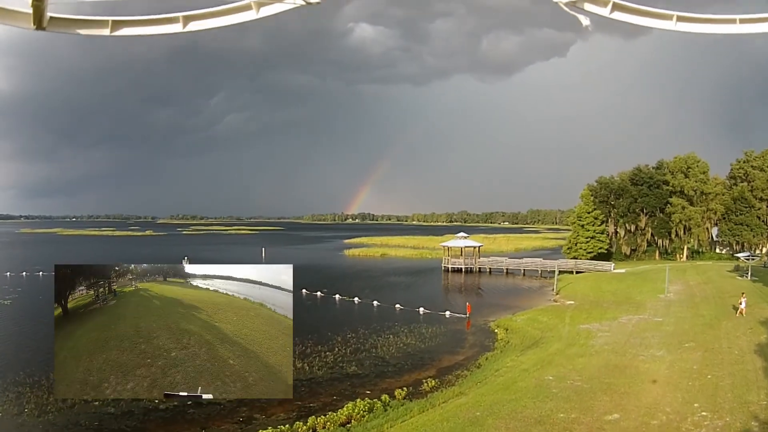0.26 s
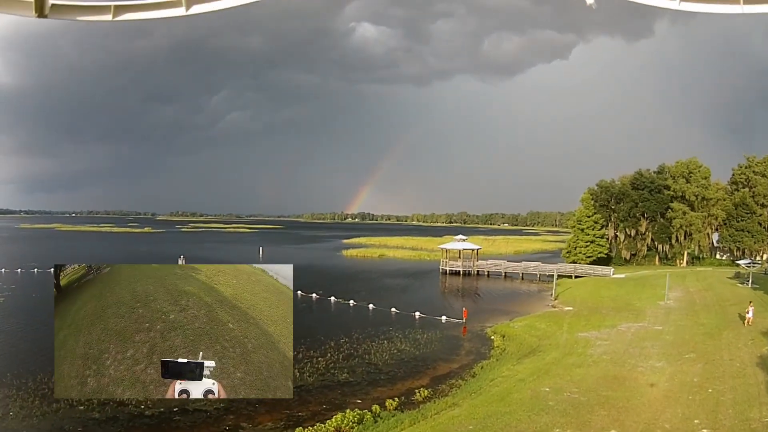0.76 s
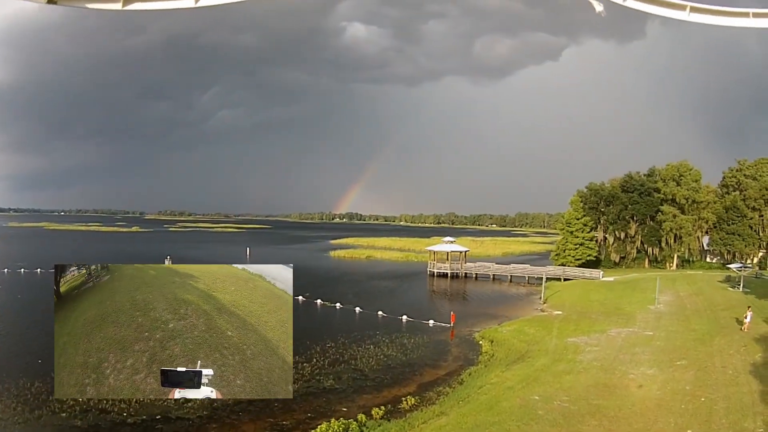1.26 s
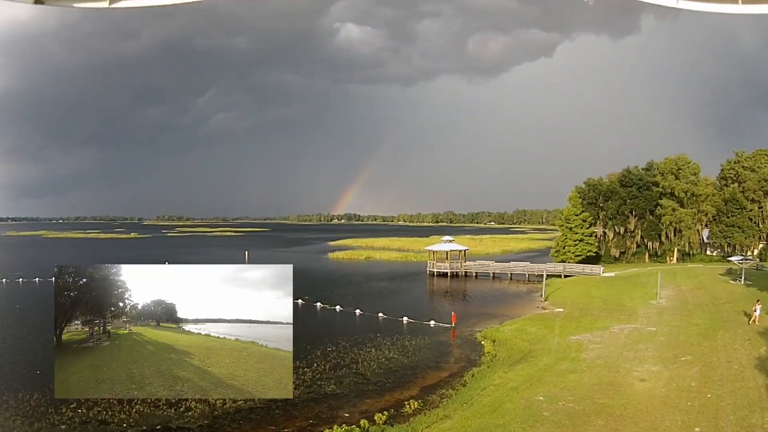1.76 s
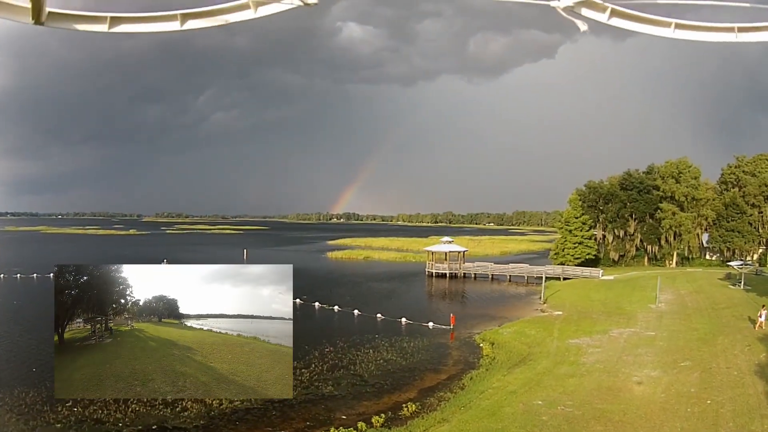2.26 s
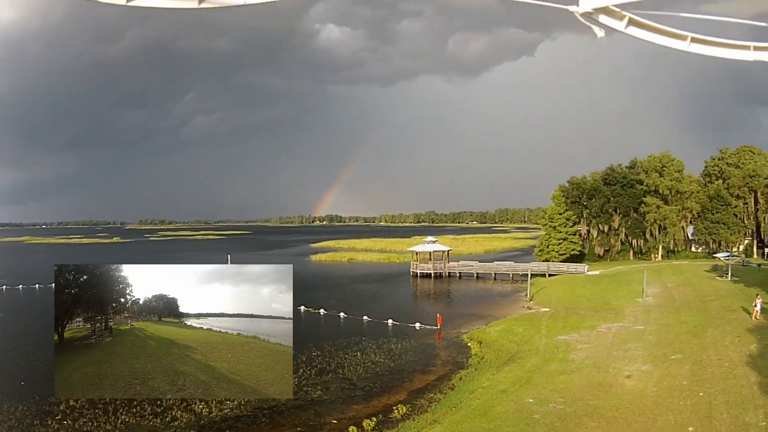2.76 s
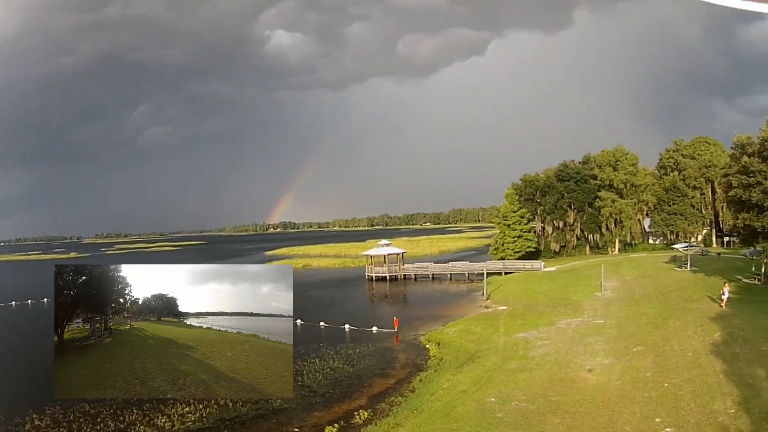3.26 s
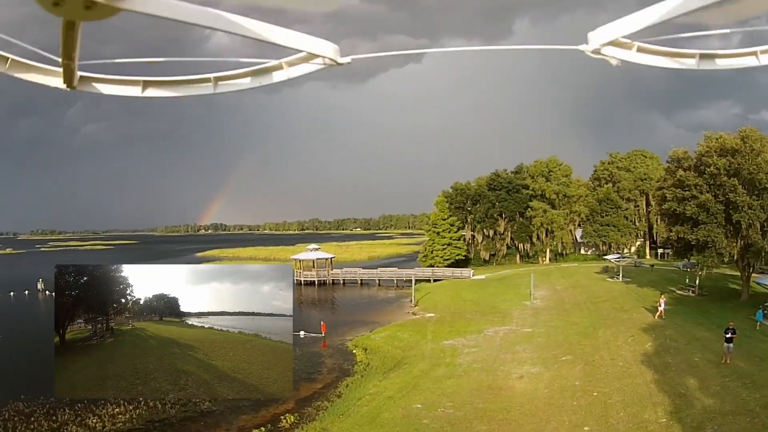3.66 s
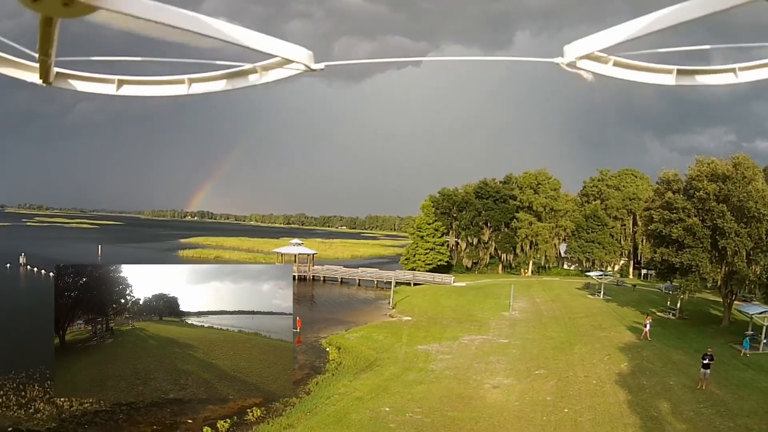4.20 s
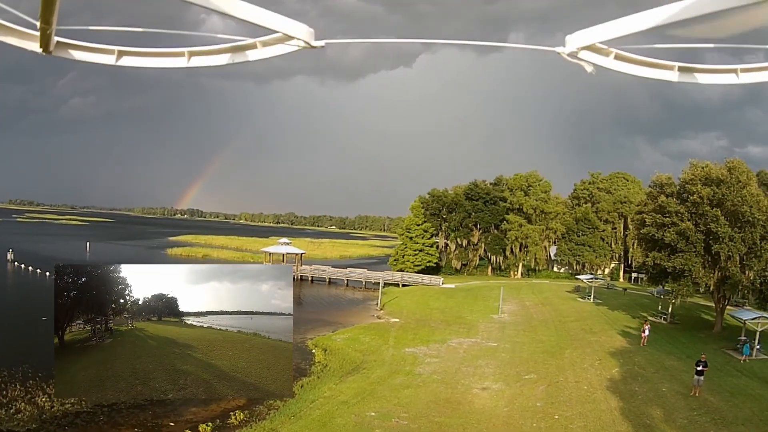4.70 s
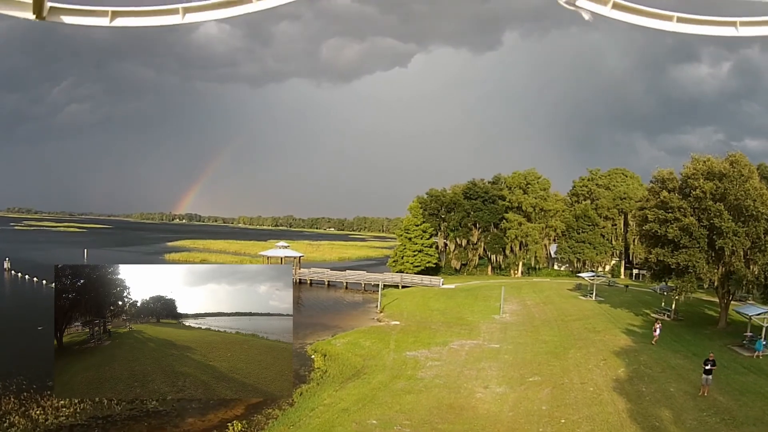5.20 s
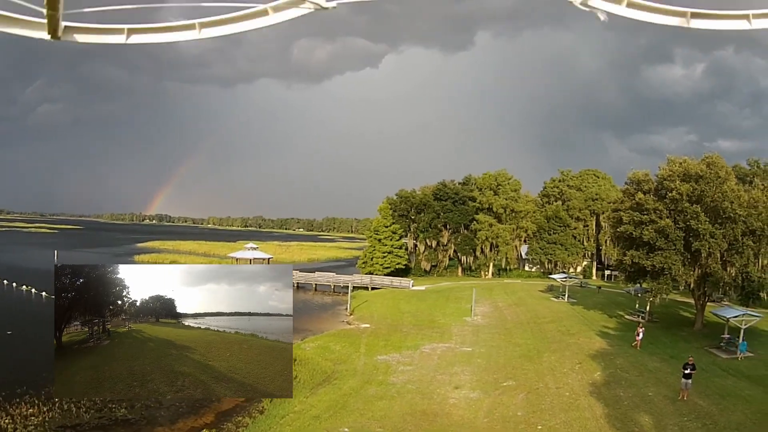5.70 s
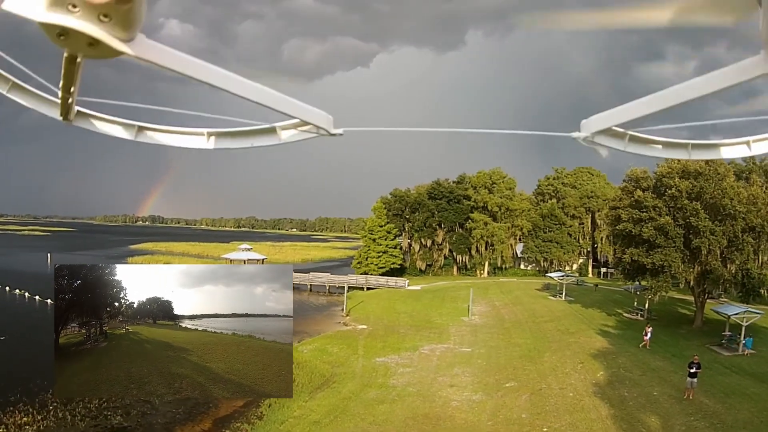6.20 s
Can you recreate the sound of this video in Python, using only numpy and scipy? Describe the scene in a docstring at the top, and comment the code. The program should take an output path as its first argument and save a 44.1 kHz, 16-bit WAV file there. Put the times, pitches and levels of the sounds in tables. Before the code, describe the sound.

A quadcopter hovers outdoors, heard from a microphone hanging just beneath it. Its propellers buzz with a wavering pitch over a hiss of churned air, with a thin motor whine and a brief raspy sizzle early on. Wind then starts to rumble, thumping hardest on the microphone a little past halfway. The buzz rises in pitch and settles again while the gusts continue.

```python
"""A quadcopter hovers and turns over a lakeside park, heard from a camera slung under it.
Two fast propellers beat against each other over two slower ones, and the blades churn the air
into a hiss. A motor whines thinly and whistles now and then; a rasping sizzle passes early on.
Gusts rumble and thump on the microphone as the craft swings round, and a few faint ticks sound."""
import sys
import numpy as np
from scipy import signal
from scipy.fft import rfft, irfft, next_fast_len
from scipy.io import wavfile
from scipy.ndimage import uniform_filter1d

SR = 44100
rng = np.random.default_rng(int(sys.argv[2]) if len(sys.argv) > 2 else 0)


def waveform_to_disk(signal):
    """Save audio, clipped to [-1, 1], as 16-bit WAV at the path in sys.argv[1]."""
    frames = np.transpose(np.atleast_2d(signal))
    scaled = np.clip(frames, -1, 1) * 32767
    samples = np.round(scaled).astype(np.int16)
    wavfile.write(sys.argv[1], SR, samples)


N = 284429
T = np.arange(N) / SR
FFT_SIZE = next_fast_len(N, real=True)
BIN_HZ = np.fft.rfftfreq(FFT_SIZE, 1 / SR)
HOVER_HZ = 225  # blade passes per second


def amp(db):
    return 10 ** (np.asarray(db) / 20)


def unit(x):
    return x / np.sqrt(np.mean(x ** 2) + 1e-20)


def curve(rows, column=1):
    """An automation lane: straight ramps between timed points."""
    rows = np.asarray(rows)
    return np.interp(T, rows[:, 0], rows[:, column])


def level_at(points, hz):
    """Level in dB of an EQ curve drawn on a log-frequency axis."""
    point_hz, db = np.transpose(points)
    return np.interp(np.log(hz + 1), np.log(point_hz + 1), db)


def colour(x, points):
    """Runs x through an EQ curve, rolled off beyond its ends; comes out at rms 1."""
    low_cut = np.minimum(BIN_HZ / points[0][0], 1) ** 2
    high_cut = np.minimum(points[-1][0] / (BIN_HZ + 1), 1) ** 2
    gain = amp(level_at(points, BIN_HZ)) * low_cut * high_cut
    return unit(irfft(rfft(x, FFT_SIZE) * gain, FFT_SIZE)[:N])


def noise(points):
    return colour(rng.standard_normal(N), points)


def wander(rate_hz):
    """A smooth random modulator of rms 1."""
    spectrum = rfft(rng.standard_normal(FFT_SIZE)) / (1 + (BIN_HZ / rate_hz) ** 2)
    return unit(irfft(spectrum, FFT_SIZE)[:N])


def spin(hz, jitter):
    """Phase of a rotor or oscillator whose rate trembles by the share `jitter`."""
    trembling_hz = hz * (1 + jitter * wander(31.1))
    return 2 * np.pi * np.cumsum(trembling_hz) / SR + rng.uniform(0, 2 * np.pi)


def throttle_nudges(depth_hz=0.52, rate_hz=5):
    """The flight controller nudges a rotor's speed up and down, a few uneven times a second."""
    cycles = np.cumsum(rate_hz * (1 + .4 * wander(3.02))) / SR
    return depth_hz * np.sin(2 * np.pi * (cycles + rng.random()))


# Fader for the lead propeller's strong harmonics as the craft tilts: time_s, level_db
LEAD_LEVEL = [(0.0, -53), (3.11, -54.5), (3.77, -54), (3.88, -53.5), (5.08, -53), (5.15, -51), (5.44, -52),
              (5.7, -49.5), (5.93, -53), (6.45, -53)]
# Their balance, keyed by harmonic number: hover_db, speed_db_per_hz, crosswind_db
LEAD_HARMONICS = {1: (-5.5, 0.39, -1.1), 3: (0, 0.099, -2), 4: (-6.5, -0.016, 4.2), 5: (-6, -0.17, -2.9)}
# The second harmonic, swelling in the hard turn: time_s, level_db
SECOND_LEVEL = [(0, -58), (.7, -59), (1.1, -63.5), (1.8, -71), (3.1, -66.5), (3.35, -69), (3.6, -70),
                (4.95, -69), (5.14, -48), (5.6, -55), (5.8, -77.5), (6.45, -64.5)]
# Seesaw that lifts the fourth harmonic and ducks the fifth: time_s, gain_db
SEESAW = [(0, -.5), (1.3, -.5), (1.7, 1), (2.3, 0), (2.8, 2), (3.3, 0), (5.2, -1), (6.45, 0)]


def lead_tones(speed, ring_hz=964, ring_width_hz=37, ring_db=6.5):
    """The lead's low harmonics in dB; an airframe resonance lifts whichever one crosses it."""
    level, windy = curve(LEAD_LEVEL), crosswind()
    tone_db = {2: curve(SECOND_LEVEL)}
    for k, (hover_db, db_per_hz, wind_db) in LEAD_HARMONICS.items():
        resonance = ring_db / (1 + ((k * speed - ring_hz) / ring_width_hz) ** 2)
        tone_db[k] = level + hover_db + db_per_hz * (speed - HOVER_HZ) + wind_db * windy + resonance
    tone_db[4] += curve(SEESAW)
    tone_db[5] -= curve(SEESAW)
    return tone_db


# EQ of the partner propeller's harmonics at the microphone: freq_hz, level_db
PARTNER_EQ = [(230, -66.5), (450, -77.5), (510, -66), (660, -67.5), (740, -69.5), (910, -73.5), (965, -65),
              (1030, -61), (1080, -70.5), (1170, -72), (1260, -77.5), (1320, -80), (1375, -77), (1450, -85),
              (1610, -76.5), (1850, -81.5), (1980, -94), (2200, -100.5), (3100, -97), (3600, -99.5)]
# The partner's fader, lowest while it lags: time_s, gain_db
PARTNER_GAIN = [(0, 0), (3.1, 1.5), (3.75, -1.5), (4, -8), (4.3, -0.5), (4.9, 1.5), (5.3, 2.5), (6.45, -3)]


def partner_tones(speed):
    """The partner's harmonics in dB, rising and dipping as its speed slides them along the EQ."""
    return {k: level_at(PARTNER_EQ, k * speed) + curve(PARTNER_GAIN) for k in range(1, 16)}


# How the airframe colours the blade buzz: freq_hz, gain_db
AIRFRAME_EQ = [(110, -11.5), (180, -12), (340, -2), (440, -8), (700, 3), (1050, 2.5), (1290, -17.5),
               (1370, -12), (1420, -27.5), (1500, -6.5), (1550, -14), (1605, -5), (1750, -8), (1830, -10.5),
               (1900, -10.5), (2020, -14), (2150, -23), (2700, -36), (3150, -18), (3600, -20.5)]
# The craft's swing toward the shore: time_s, turn_share (0-1)
TURN = [(0, 0), (2.8, 0), (4, .35), (5.2, .5), (5.8, .9), (6.45, 1)]
# EQ that fades in on the blade harmonics with that swing: freq_hz, gain_db
TURNED_EQ = [(345, -5.5), (460, 2), (660, -6), (800, -2.5), (950, -2.5), (1150, 0.5), (1350, -3),
             (1600, 1.5), (1780, 3.5), (1880, 5.5), (1970, -2), (2150, 1.5)]


def propeller(speed, phase, flutter, imbalance_db, tone_db, buzz_db, count=15):
    """Blade-pass harmonics: those in tone_db have their own level, the rest buzz through the frame."""
    # The buzz grows with the lead's speed and in a crosswind.
    drive_db = 0.1174 * (curve(LEAD_SPEED) - HOVER_HZ) + 0.5 * crosswind()
    buzz_level = -65.5 + drive_db + buzz_db
    inflow = [wander(24) for _ in range(7)]
    out, turn = np.zeros(N), curve(TURN)
    for k in range(1, count + 1):
        db = tone_db[k] if k in tone_db else buzz_level + level_at(AIRFRAME_EQ, k * speed)
        level = amp(db + turn * level_at(TURNED_EQ, k * speed))
        # Uneven inflow shakes the high harmonics most.
        shake = 1 + flutter * np.sqrt(k) * np.roll(inflow[k % len(inflow)], k * SR)
        out += level * shake * np.cos(k * phase + rng.uniform(0, 2 * np.pi))
    for k in np.arange(1, count // 2) - .5:  # unequal blades add weak tones between the harmonics
        level = amp(buzz_level + imbalance_db + level_at(AIRFRAME_EQ, k * speed))
        out += level * np.cos(k * phase + rng.uniform(0, 2 * np.pi))
    return np.sqrt(2) * out


# Blade-pass pitch of the lead propeller: time_s, pitch_hz
LEAD_SPEED = [(0.0, 220), (0.08, 222), (0.19, 218.7), (0.38, 218.3), (0.52, 223.3), (0.77, 228),
              (0.95, 221.4), (1.22, 221.2), (1.36, 224.5), (1.5, 223.8), (1.87, 231.5), (2.03, 224.0),
              (2.26, 229.6), (2.55, 216.2), (2.7, 217.5), (2.83, 223), (3.02, 213.3), (3.34, 220.5),
              (3.5, 240.5), (3.62, 230), (3.73, 247), (3.89, 224.3), (4.0, 224), (4.12, 229), (4.51, 228),
              (4.69, 234.5), (4.78, 233.3), (4.92, 236.5), (5.06, 251), (5.15, 269), (5.32, 252),
              (5.4, 252.5), (5.51, 245), (5.7, 241), (5.98, 218.3), (6.14, 223.2), (6.27, 209.5),
              (6.45, 217.3)]
# Blade-pass pitch of its partner, which surges and lags to steer: time_s, pitch_hz
PARTNER_SPEED = [(0, 232), (.15, 233), (.45, 228), (.92, 227.5), (1.28, 213.5), (1.47, 220), (1.62, 213.5),
                 (1.85, 222), (2.25, 228), (2.52, 221), (2.7, 218), (2.88, 228), (3.1, 229), (3.18, 243),
                 (3.27, 246), (3.34, 256), (3.4, 256), (3.52, 235), (3.75, 240), (3.97, 207), (4.2, 218),
                 (4.58, 227), (4.8, 224), (4.95, 226), (5.23, 249), (5.42, 240), (5.6, 243), (5.98, 218),
                 (6.2, 220), (6.45, 216)]


def rotors(slow_hz=172.9, drift_hz=8, lead_gain_db=-5):
    """Two fast propellers beat over a slower pair that drifts together, all in a wash of air."""
    lead, partner = curve(LEAD_SPEED), curve(PARTNER_SPEED)
    slow = slow_hz + drift_hz * wander(1.5)
    slow_mate = slow * 1.035
    lead_phase = spin(lead + throttle_nudges(), jitter=.0018)
    partner_phase = spin(partner + throttle_nudges(), jitter=.002)
    flutter = 0.063 + 0.0077 * crosswind()
    tones = amp(lead_gain_db) * propeller(lead, lead_phase, flutter,
                                          imbalance_db=-22, tone_db=lead_tones(lead), buzz_db=2.5)
    tones += propeller(partner, partner_phase, flutter,
                       imbalance_db=-27.5, tone_db=partner_tones(partner), buzz_db=-11.5)
    tones += propeller(slow, spin(slow, jitter=0.0021), flutter=0.12,
                       imbalance_db=-19, tone_db={2: -70}, buzz_db=-21)
    tones += propeller(slow_mate, spin(slow_mate, jitter=0.0045), flutter=0.13,
                       imbalance_db=-26, tone_db={}, buzz_db=-16)
    return tones + blade_wash(lead_phase, partner_phase)


# Colour of the air churned by the blades: freq_hz, gain_db
WASH_EQ = [(150, 5), (350, 3), (550, 3), (750, 4.5), (1050, 5), (1400, -7), (1800, -2.5), (2300, -13),
           (2700, -11.5), (3000, -9), (3300, -10), (3980, -14), (4650, -9), (4980, -13), (5400, -7.5),
           (6000, -16), (6500, -25), (7200, -52.5), (10000, -62), (14000, -68)]
# Its fader: time_s, level_db
WASH_LEVEL = [(0, -62), (.3, -63), (.5, -62), (1.35, -64), (1.95, -61.5), (2.9, -63), (3.5, -60.5),
              (3.95, -65.5), (4.35, -62.5), (4.85, -62), (5.2, -58), (5.7, -57), (6.05, -60.5), (6.25, -62),
              (6.45, -61)]


def blade_wash(lead_phase, partner_phase, flicker_db=.9):
    """Churned air hisses, chopped once per blade pass by each fast propeller."""
    chop = 1 + 0.04 * np.cos(lead_phase) + 0.12 * np.cos(partner_phase)
    hiss = colour(chop * rng.standard_normal(N), WASH_EQ)
    return hiss * amp(curve(WASH_LEVEL) + flicker_db * wander(18))


# The motor whine, clearest in the calm hover: time_s, pitch_hz, level_db
WHINE_PATH = [(0, 3340, -82), (.13, 3410, -86), (.26, 3600, -86), (.45, 3580, -77), (.54, 3420, -75),
              (.66, 3450, -80), (.76, 3450, -77), (.86, 3480, -80), (1.05, 3390, -78), (1.5, 3250, -113),
              (3.2, 3100, -109), (3.75, 3164, -82), (4.1, 3060, -88), (4.6, 3145, -81), (5.3, 2945, -84),
              (6.1, 3120, -81.5), (6.45, 3240, -84)]


def motor_whine(gain_db=4.5):
    """A motor sings one thin, wavering tone."""
    level = amp(curve(WHINE_PATH, column=2) + gain_db)
    return level * np.sin(spin(curve(WHINE_PATH), jitter=0.0023))


# Fader for the deepest, slowest buffeting: time_s, level_db
HEAVE_LEVEL = [(0, -63.5), (.7, -60.5), (1.05, -57.5), (1.5, -53.5), (1.85, -52), (2.1, -50), (2.7, -53),
               (3.1, -50.5), (3.6, -48.5), (3.9, -37), (4.3, -40.5), (4.9, -45.5), (5.4, -42.5), (6.1, -41),
               (6.45, -45.5)]
# Its sub-bass colour: freq_hz, gain_db
HEAVE_EQ = [(20, -7), (30, -6.5), (45, 0), (62, -1.5), (85, -7.5), (130, -35)]
# Wind pressure on the microphone, the rumble's fader: time_s, level_db
GUST_LEVEL = [(0, -54.5), (1.35, -57), (1.68, -52.5), (1.87, -41), (2.2, -44), (2.7, -49.5), (3.07, -47.5),
              (3.35, -42.5), (3.68, -41.5), (3.87, -30), (3.97, -37.5), (4.06, -29.5), (4.17, -34.5),
              (4.33, -33.5), (4.45, -33), (4.8, -38.5), (4.96, -42), (5.2, -36), (5.7, -38), (6.08, -36),
              (6.45, -42.5)]
# The rumble's bass colour: freq_hz, gain_db
RUMBLE_EQ = [(45, -9), (70, -1), (92, 5), (118, 3), (150, -0.5), (200, -9.5), (280, -29.5)]
# Fader for the small eddies: time_s, level_db
SMALL_EDDY_LEVEL = [(0, -72), (1.5, -74.5), (1.85, -63.5), (3.1, -62), (3.4, -56), (3.68, -54), (3.9, -47),
                    (4.15, -44), (4.9, -44.5), (5.7, -50), (6.1, -54.5), (6.45, -55.5)]
# Their low-mid colour: freq_hz, gain_db
SMALL_EDDY_EQ = [(100, -15), (200, 4), (280, 0.4), (400, -11), (550, -19.5), (800, -34.5), (1500, -60.5)]


def wind(gustiness_db=0.5, rumble_gain_db=-1.5, eddy_gain_db=2):
    """Large eddies heave, rumble and thump; strong gusts add smaller, higher ones."""
    heave = amp(curve(HEAVE_LEVEL)) * buffet(HEAVE_EQ, steadiness=0.78)
    rumble_db = curve(GUST_LEVEL) + rumble_gain_db + gustiness_db * wander(3.4)
    rumble = amp(rumble_db) * buffet(RUMBLE_EQ, steadiness=0.36)
    eddies = amp(curve(SMALL_EDDY_LEVEL) + eddy_gain_db) * buffet(SMALL_EDDY_EQ, steadiness=0.23)
    return heave + eddies + gust_front() + with_thumps(rumble)


def buffet(points, steadiness):
    """Turbulence at the microphone port; steadiness (0-1) evens it out like a compressor."""
    turbulence = noise(points)
    power = uniform_filter1d(turbulence ** 2, size=4400)
    return unit(turbulence / (power + 1e-6) ** (steadiness / 2))


def crosswind(calm_db=-58, range_db=14.5):
    """How strongly the gusts stream across the propellers, 0-1."""
    return np.clip((curve(GUST_LEVEL) - calm_db) / range_db, 0, 1)


# Fader for the faint treble hiss: time_s, level_db
TREBLE_LEVEL = [(0, -79), (1.6, -79), (1.95, -84), (2.6, -79.5), (3.4, -81), (4.1, -101), (4.85, -88),
                (5.7, -85.5), (6.05, -95.5), (6.45, -83)]
# Its top-end colour: freq_hz, gain_db
TREBLE_EQ = [(6000, 7.5), (7200, 7), (8500, 3), (9500, 6), (10400, 5), (11500, -5), (15000, -8)]


def treble_hiss(flicker_db=6.5):
    """A faint treble hiss that flickers and drops away in the louder passages."""
    flicker = flicker_db * crosswind() * np.tanh(wander(24))
    return amp(curve(TREBLE_LEVEL) + flicker) * noise(TREBLE_EQ)


# Flares of motor whistle: peak_s, length_s, pitch_hz, glide_hz_per_s, level_db
WHISTLE_FLARES = [(0.276, 0.115, 4780, 149, -64.5), (2.34, .08, 4730, -1, -74),
                  (2.43, 0.038, 4760, 200.5, -64.5), (2.6, 0.042, 4760, 2000, -65),
                  (2.686, 0.019, 4760, -1500, -68), (2.755, 0.02, 4740, 2500, -63.5),
                  (2.98, .03, 4480, -1800, -75), (3.098, 0.052, 4730, -2500, -74),
                  (3.36, 0.036, 4770, 1602, -68), (3.84, 0.045, 4750, 1200, -66),
                  (4.6, .08, 4780, -200, -78)]


def motor_whistles(reach_hz=150, ring_hz=4778, ring_gain_db=-24, ring_width_hz=45, roughness=0.22):
    """Motor whines flare as they glide near a sharp resonance, which also rings faintly throughout."""
    flares = np.zeros(N)
    tremble = 1 + .0013 * wander(70)
    for peak_s, length_s, pitch_hz, glide, db in WHISTLE_FLARES:
        t = T - peak_s
        hz = (pitch_hz + reach_hz * np.tanh(glide * t / reach_hz)) * tremble
        swell = amp(db) / (1 + (t / (length_s * 2 / 3)) ** 4)
        flares += swell * np.sin(2 * np.pi * np.cumsum(hz) / SR)
    ring_level = amp(curve(WASH_LEVEL) + ring_gain_db)
    ring = ring_level * wander(ring_width_hz) * np.sin(2 * np.pi * ring_hz * T)
    return flares * (1 + roughness * wander(60)) + ring


# Colour of the passing sizzle: freq_hz, gain_db
SIZZLE_EQ = [(2000, -10), (2700, 6), (3450, 5.5), (4100, 0), (4500, -11), (4900, -39), (5300, -25),
             (6500, -34), (7800, -7), (9700, -19), (11800, -5.5), (12800, -18)]
# Its hollow resonances as it begins: pitch_hz, gain_db
SIZZLE_RESONANCES = [(2850, -5), (3150, -6), (3560, -5), (4650, -8.5), (5430, -10), (6120, -10),
                     (7150, -16), (8050, -13)]


def sizzle(start_s=0.28, rise_s=0.31, end_s=1.73, fall_s=0.37, level_db=-69, sag_db_per_s=2):
    """A grainy, rasping hiss with sinking hollow resonances comes and goes in the calm hover."""
    age = T - start_s
    fade = np.clip(np.minimum(age / rise_s, (end_s - T) / fall_s), 0, 1)
    rasp_db = 2 * np.sin(spin(hz=28, jitter=0.34))
    sink = 1 - .05 * age  # the resonances drop 5% a second
    rings = sum(amp(db) * wander(170) * np.sin(spin(hz * sink, jitter=0.00388))
                for hz, db in SIZZLE_RESONANCES)
    hiss = noise(SIZZLE_EQ) + rings
    grain_db = 2 * wander(100)
    return fade * amp(level_db - sag_db_per_s * age) * unit(hiss * amp(grain_db + rasp_db))


def puff(peak_s=.54, width_s=.016, level_db=-57):
    """One soft, dull puff of air."""
    swell = np.exp(-((T - peak_s) / width_s) ** 2)
    return amp(level_db) * swell * noise([(400, -8), (560, 0), (800, -6), (1200, -5), (1600, -20)])


# Single large eddies hitting the microphone: peak_s, width_s, pitch_hz, peak_db
EDDY_THUMPS = [(2.17, .016, 95, -34), (3.53, .022, 85, -30), (3.885, .022, 92, -24),
               (4.06, .012, 100, -22.5), (4.16, .022, 100, -22.5), (4.212, .012, 110, -24),
               (4.268, .014, 95, -24), (4.345, .014, 110, -25), (4.44, .016, 100, -24),
               (4.787, .014, 105, -26)]


def with_thumps(rumble):
    """Now and then one large eddy takes over from the rumble for a few heavy swings."""
    for peak_s, width_s, hz, db in EDDY_THUMPS:
        crossfade = np.exp(-((T - peak_s) / width_s) ** 2)
        thump = amp(db) * np.sin(2 * np.pi * (hz * (T - peak_s) + rng.random()))
        rumble = rumble * (1 - crossfade) + crossfade * thump
    return rumble


# Small sharp ticks: start_s, level_db
TICK_HITS = [(3.622, -66), (4.664, -56), (4.815, -67), (5.58, -66), (6.243, -67)]


def ticks(decay_s=0.011, gain_db=-6):
    """Dry cracks: bright noise with an instant attack and a very short tail."""
    envelope = np.zeros(N)
    for start_s, db in TICK_HITS:
        envelope += amp(db + gain_db) * (T >= start_s) * np.exp(-abs(T - start_s) / decay_s)
    return envelope * noise([(1000, -3), (3500, 0), (6000, -3), (10000, -10), (14000, -20)])


# Colour of the main gust's front: freq_hz, gain_db
FRONT_EQ = [(260, -6), (340, 2.5), (450, -3.5), (600, -17), (900, -29.5)]


def gust_front(peak_s=4.0, width_s=0.23, level_db=-50):
    """The front of the main gust tears at the microphone port."""
    return amp(level_db) * np.exp(-((T - peak_s) / width_s) ** 2) * noise(FRONT_EQ)


def scene():
    """The craft, the wind and the small noises, mixed to mono."""
    craft = rotors() + motor_whistles() + motor_whine()
    return (craft + wind() + sizzle() + treble_hiss() + puff() + ticks())[None]


def record(dry, cutoff_hz=15200):
    """The camera's band limit, a steep low-pass."""
    low_pass = signal.firwin(511, cutoff_hz, window=("kaiser", 9), fs=SR)
    return signal.oaconvolve(dry, low_pass[None], "same")


dry = scene()
out = record(dry)
waveform_to_disk(out)
```